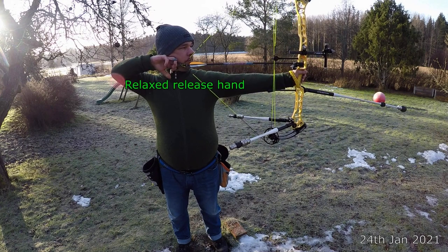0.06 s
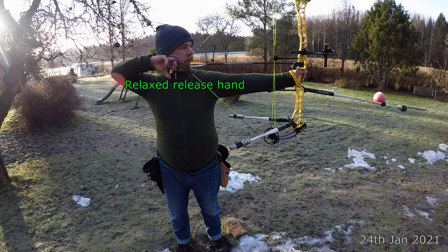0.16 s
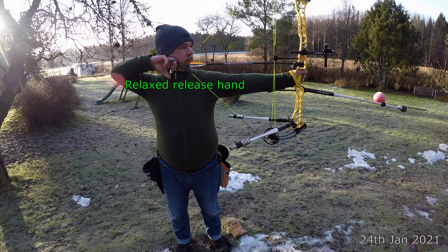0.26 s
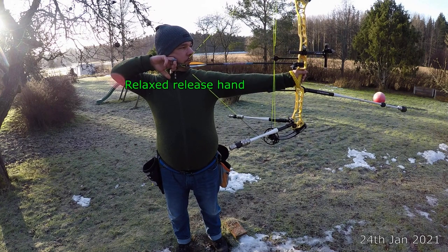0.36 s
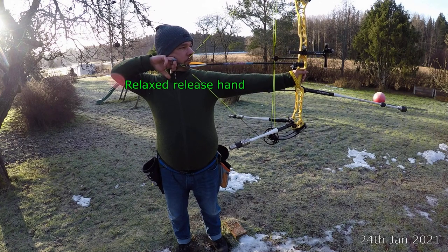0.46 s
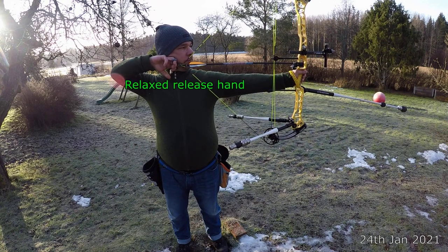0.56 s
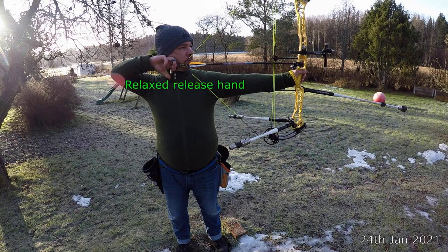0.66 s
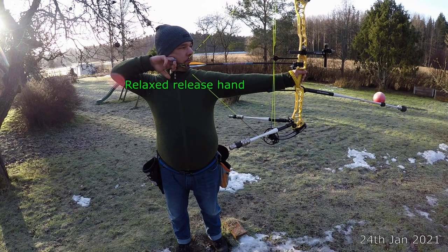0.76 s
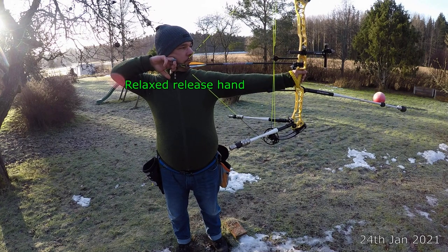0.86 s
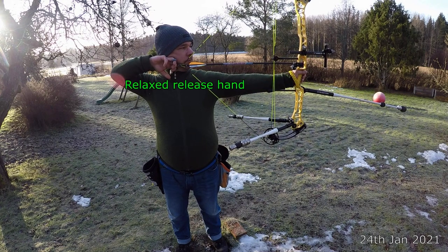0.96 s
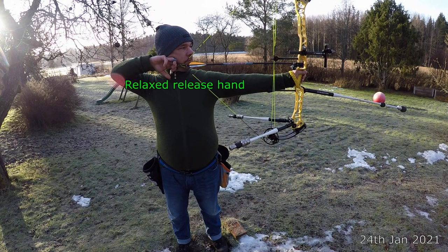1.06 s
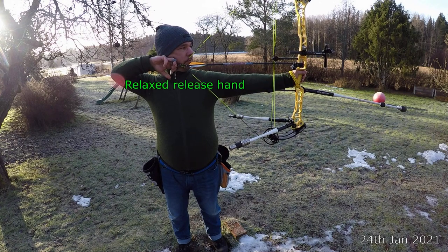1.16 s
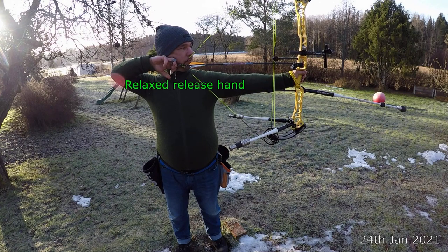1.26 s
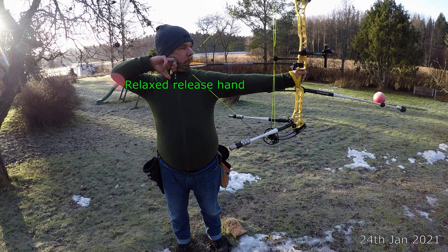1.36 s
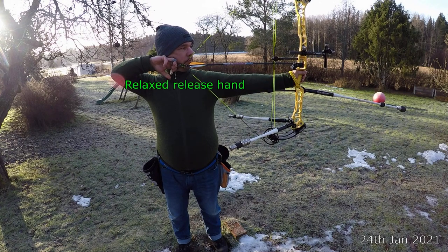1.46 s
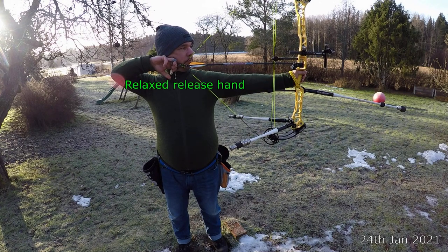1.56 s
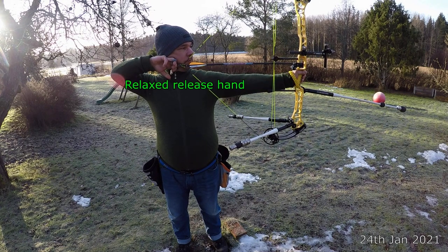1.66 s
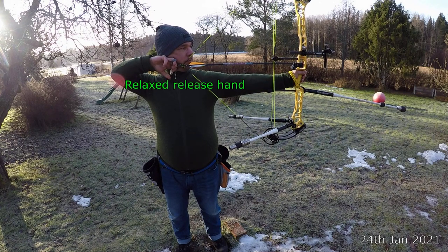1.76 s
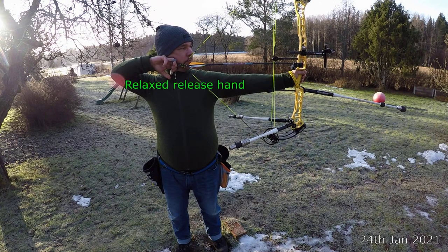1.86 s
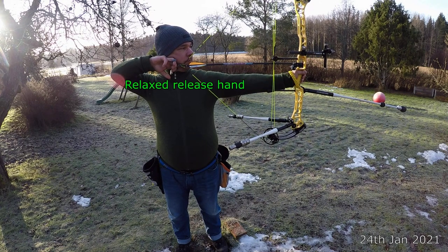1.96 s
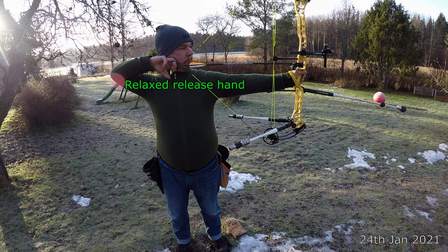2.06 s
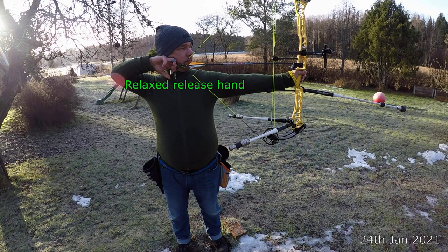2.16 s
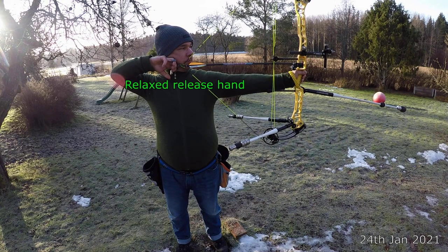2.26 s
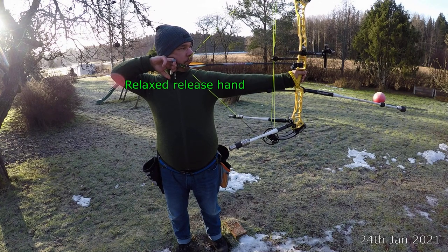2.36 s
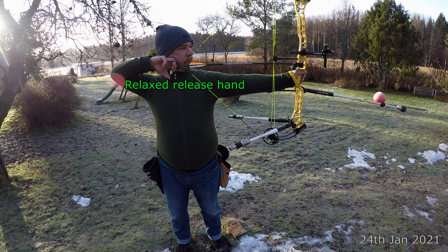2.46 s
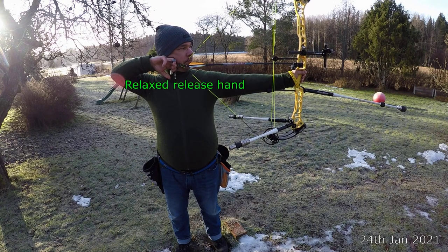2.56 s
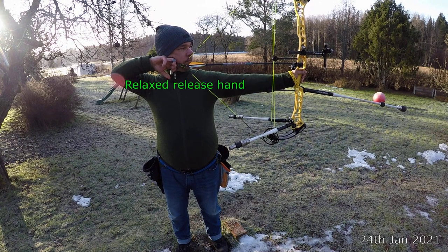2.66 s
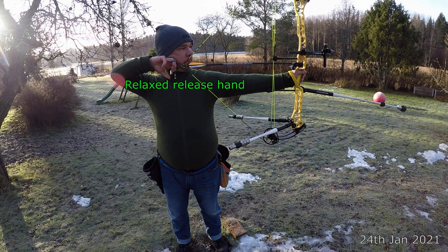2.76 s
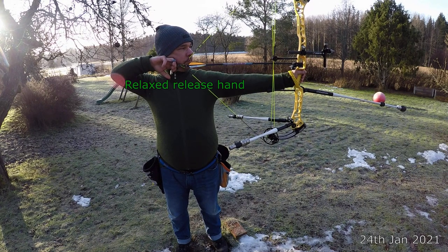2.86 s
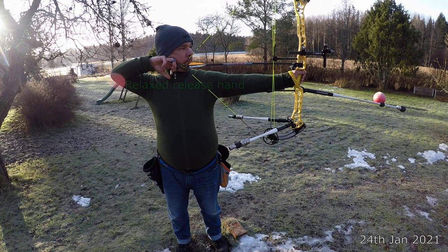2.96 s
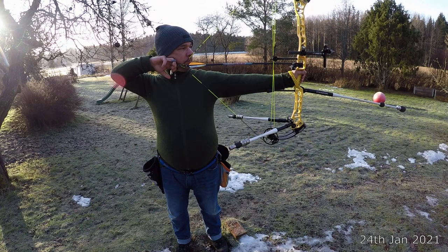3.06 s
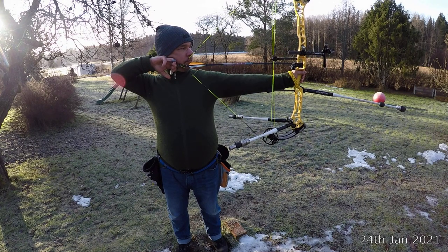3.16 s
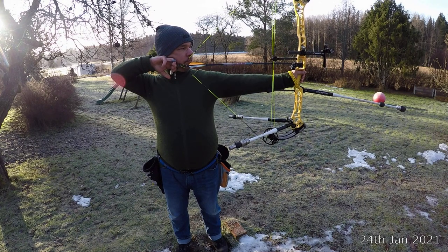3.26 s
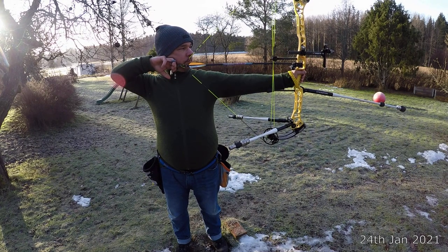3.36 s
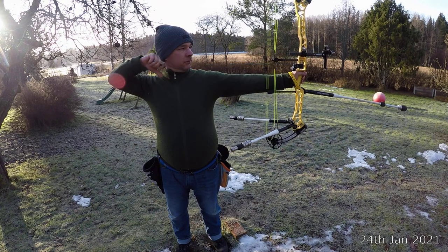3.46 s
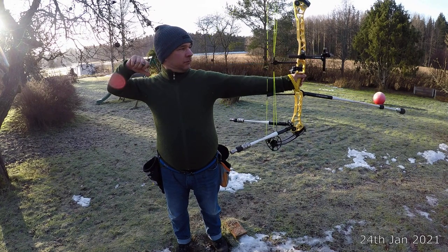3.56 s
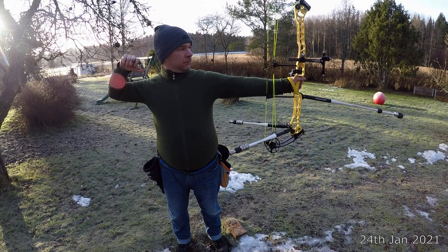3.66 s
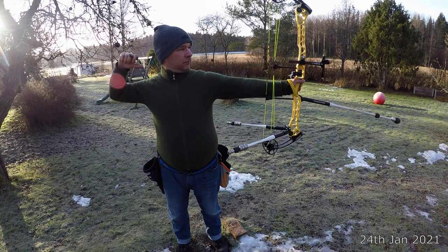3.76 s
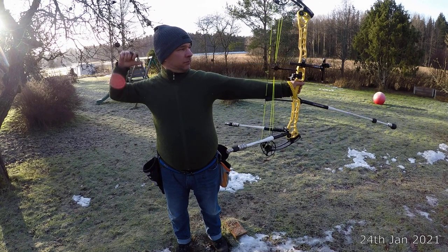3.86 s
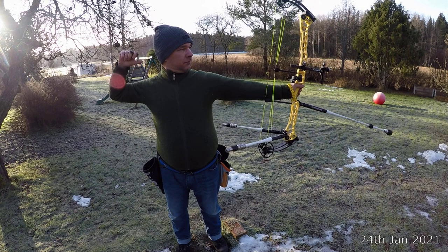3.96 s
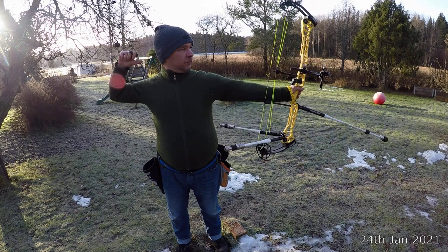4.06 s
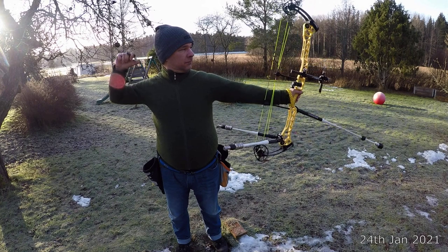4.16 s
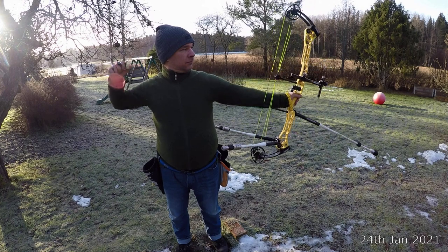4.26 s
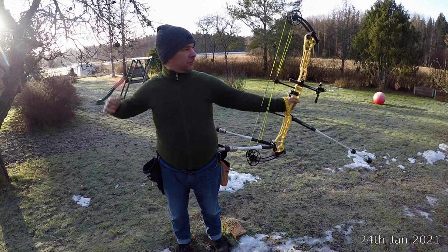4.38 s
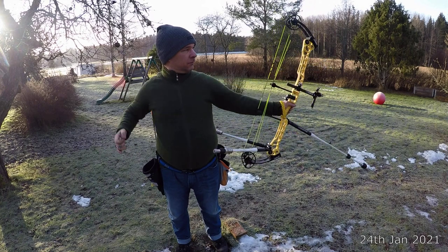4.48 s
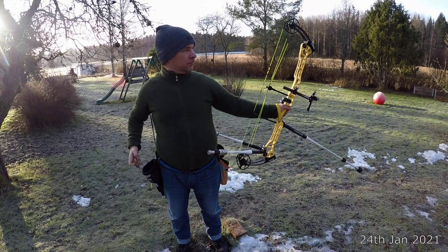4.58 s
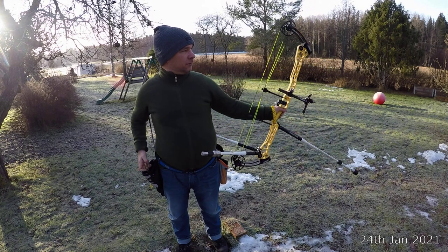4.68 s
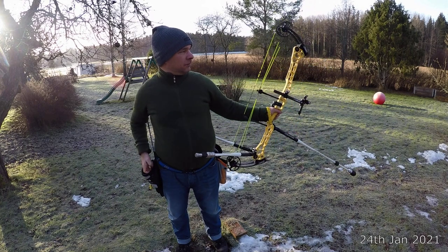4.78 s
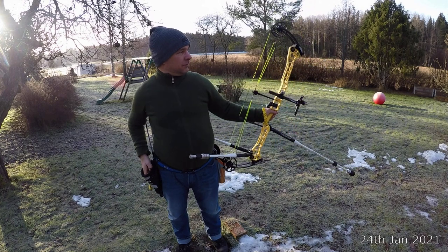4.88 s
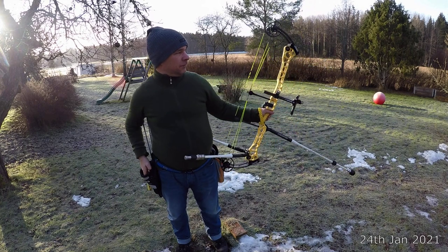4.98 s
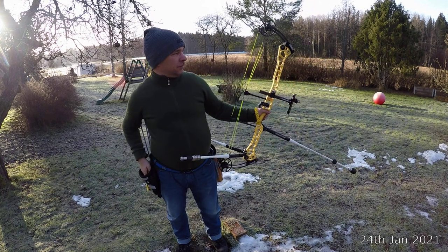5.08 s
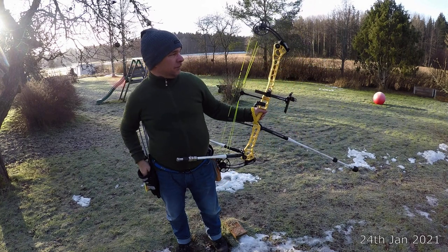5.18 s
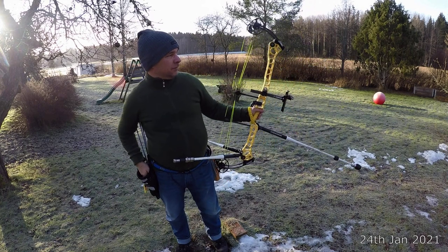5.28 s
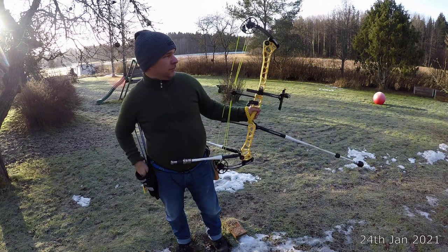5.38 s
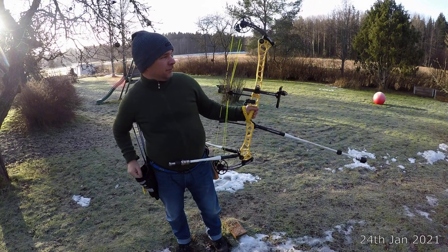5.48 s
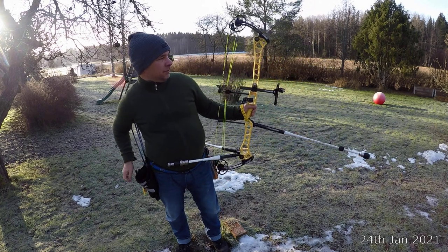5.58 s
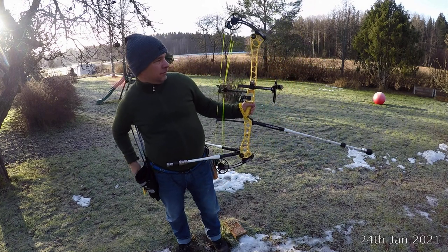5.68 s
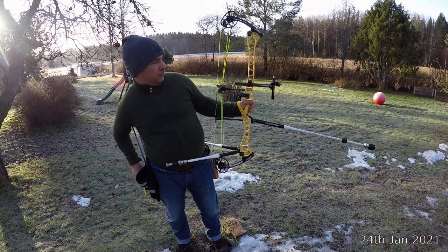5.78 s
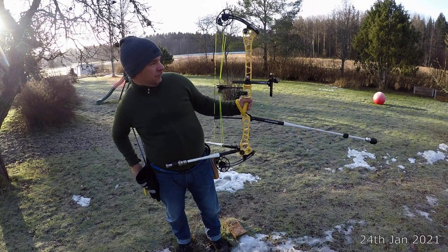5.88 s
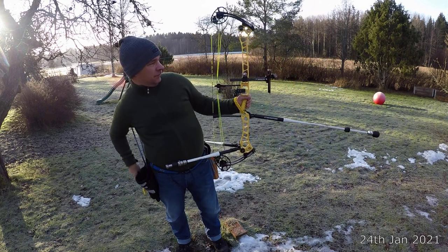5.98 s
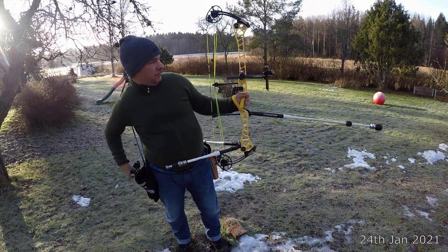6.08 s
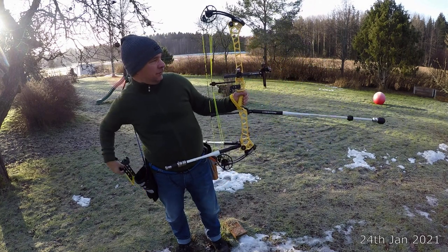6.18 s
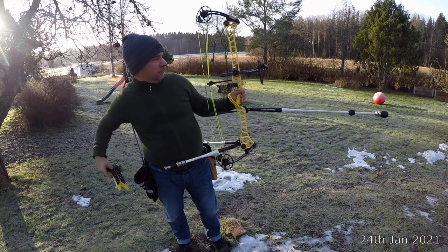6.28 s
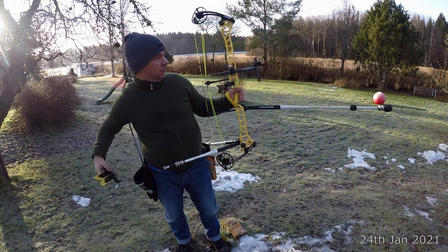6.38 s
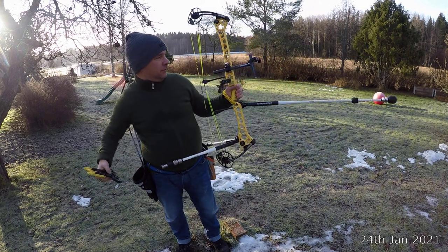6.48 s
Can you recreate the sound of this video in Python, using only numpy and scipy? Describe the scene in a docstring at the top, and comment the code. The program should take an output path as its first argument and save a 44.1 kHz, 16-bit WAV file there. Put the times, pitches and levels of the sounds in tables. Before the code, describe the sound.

Outdoors on a quiet lawn, a faint wide low rumble and thin hiss run throughout. From about 1.55 to 2.45 seconds a small bird scolds with high, buzzy arched whistles, very quick at first, then slowing. At 2.26 a crisp tiny steel double click cuts in. Around 3.02 a faint distant animal call glides up and fades. At 3.41 the release clicks; within 20 milliseconds the arrow zips briefly upward and the bow slams in a loud, dry cluster of cracks at 3.43, with a low thump, short twang, metallic ring and rattle, and a faint echo off the trees. At 3.72 the arrow smacks a target, duller and weaker, toward the right, with a short boom. The bird resumes from 3.6 to 5.7, rushing and slowing unevenly. Faint ticks come at 4.44 and 5.09, soft bumps from 5.5, cloth rustle near 6, and a light tap at 6.17.

```python
"""A compound bow is shot on a lawn: string and cams slam home in sharp cracks, and limbs and cables ring as modes.
The release aid, struck steel modes with noise bursts, clicks at full draw, clicks as it lets go, and ticks later.
The arrow zips over its rest as a sliding tone with noise, then thuds into the target: smack, modes and low thumps.
A small bird scolds in two bouts of arched whistles, a far animal calls once, and shaped noise rumbles and hisses.
At the end soft bumps, a rustle of cloth and light taps are heard as the archer reaches for his pouch."""
import sys
import numpy as np
from scipy import signal
from scipy.fft import rfft, irfft, next_fast_len
from scipy.io import wavfile
from scipy.ndimage import uniform_filter1d

SR = 44100
rng = np.random.default_rng(int(sys.argv[2]) if len(sys.argv) > 2 else 0)


def pcm_store(signal):
    """Save signal as 16-bit PCM."""
    levels = np.round(np.clip(np.atleast_2d(signal), -1, 1) * 32767)
    wavfile.write(sys.argv[1], SR, levels.astype(np.int16).T)


N = 287973
TIME = np.arange(N) / SR   # s

# Levels are in dB; some sources add a level of their own.
# Colours of the two background noises, common to both ears and opposed: (frequency [Hz], level [dB])
AIR_MID_SPECTRUM = [(30, -13.5), (100, -11), (135, -1.5), (165, -0.5), (230, -5.5), (330, -10), (480, -14),
                    (1100, -18.5), (2000, -23.5), (4700, -32), (7000, -29.5), (10000, -32.5), (15000, -48)]
AIR_SIDE_SPECTRUM = [(30, -9), (100, -8), (135, 0.5), (170, 1.5), (300, -2), (500, -4.5), (900, -5),
                     (1500, -12.5), (2500, -22), (4500, -32.5), (7000, -25.5), (10000, -29), (15000, -44.5)]
# Resonances in the microphone hiss: (frequency [Hz], bandwidth [Hz], level [dB])
HISS_RESONANCES = [(5726, 240, -72.5), (8710, 210, -80.5)]
# Pace of the bird's two bouts: both start hurried and slow down,
# the second then speeds up and slows by turns: (time [s], pace [notes/s])
FIRST_BOUT_PACE = [(1.561, 24.6), (1.97, 21.4), (2.186, 13.5), (2.46, 9.2)]
SECOND_BOUT_PACE = [(3.608, 22.3), (3.917, 21.7), (4.33, 12.9), (4.69, 9.2), (4.879, 16.0), (5.109, 6.13),
                    (5.264, 16.5), (5.484, 12.7), (5.68, 14.4)]
# Metal contacts in the release aid: (time [s], level [dB], brightness [dB/octave])
RELEASE_CONTACTS = [(2.2626, -2, 2), (2.26392, -3, -2), (3.4108, -2, -1), (3.412, -0.5, 2),
                    (4.438, -29, 12), (4.443, -30.5, 15), (5.093, -32.5, 12)]
# Modes of its steel parts: (frequency [Hz], level [dB], decay time t60 [s])
RELEASE_AID_MODES = [(513, -40, 0.034), (2330, -60, 0.017), (2810, -45, 0.021), (3120, -37.5, 0.046),
                     (3800, -19.5, 0.014), (5900, -24.5, 0.017), (6830, -26.5, 0.018), (7170, -28, 0.022),
                     (7450, -22.5, 0.012), (9440, -40, 0.024)]
# Pitch of the shaft on the rest, rising with its speed and dropping as it clears: (time [s], frequency [Hz])
SHAFT_WHINE = [(3.4275, 3000), (3.4305, 3800), (3.4338, 5400), (3.4383, 3200)]
# String and cams slam home and rebound: (time [s], level [dB])
STRING_SLAMS = [(3.4313, 0.5), (3.4367, -2), (3.4412, -11), (3.4455, -6.5), (3.4497, -12)]
# Modes of limbs, riser and cables: (frequency [Hz], level [dB], decay time t60 [s])
LIMB_AND_CABLE_MODES = [(252.6, -26, 0.2), (358, -26.5, 0.17), (392, -27.5, 0.18), (499, -25.5, 0.18),
                        (523, -30.5, 0.21), (600.5, -28, 0.25), (640, -35, 0.22), (752, -24.5, 0.19),
                        (791, -30.5, 0.28), (818, -30.5, 0.21), (1070, -33.5, 0.33), (1255, -41, .2),
                        (1470, -35, 0.26), (1697, -28, 0.15), (1870, -32, 0.18), (1950, -31, .15),
                        (2640, -35, .14), (3350, -30, 0.075), (3500, -33, 0.09), (4025, -39, .1),
                        (5960, -36, .12), (6600, -35, .11)]
# The point strikes, then the shaft drives in: (time [s], level [dB])
ARROW_IMPACTS = [(3.7198, 5), (3.7224, -14.5)]
# Modes of the target face: (frequency [Hz], level [dB], decay time t60 [s])
FACE_MODES = [(496, -33, 0.04), (665, -17, .025), (767, -16, 0.033), (990, -27, 0.02), (2470, -26, 0.043),
              (3080, -29, .035), (4400, -22, 0.025)]
# Soft bumps of body and gear: (time [s], frequency [Hz], level [dB])
SOFT_BUMPS = [(5.487, 282, -40), (5.718, 272, -39.5), (5.945, 195, -42), (6.151, 171, -41.5)]
# Taps at the pouch: (time [s], level [dB])
TAPS_AT_POUCH = [(6.1703, -38.5), (6.176, -60)]
# Colours of the contact noises and of the echo: (frequency [Hz], level [dB])
TICK_SPECTRUM = [(300, -17), (1600, -21), (3000, -2.5), (3700, -3), (4800, -19), (6000, -2.5), (7500, 2.5),
                 (8500, -16), (10000, -10), (15000, -29)]
CRACK_SPECTRUM = [(150, -29), (700, -3), (1500, -5.5), (2600, -3), (3700, -1.5), (5200, -1), (7300, -2.5),
                  (8500, -15.5), (10000, -17), (15000, -34)]   # also colours the shaft's rub and the cloth
RATTLE_SPECTRUM = [(130, -13), (300, 0.5), (800, 3), (1250, -3.5), (2500, -8.5), (4000, -14), (5200, -20),
                   (7000, -12.5), (8500, -26), (15000, -39)]
SMACK_SPECTRUM = [(200, -3), (900, 3), (1500, -3.5), (4300, -2), (5300, -11), (6500, -6.5), (9000, -11),
                  (15000, -24)]
ECHO_SPECTRUM = [(120, -14.5), (200, 1), (700, 7), (1200, 3), (2500, -3), (4000, -1), (7000, -5),
                 (9000, -11.5), (15000, -31)]
TAP_SPECTRUM = [(200, -5), (600, -5), (1050, 3.5), (2000, -5.5), (3000, -7.5), (3800, -3), (4500, -9),
                (6500, -5), (15000, -26)]

EASY_NOTES_PER_S, EASY_NOTE_S = 10.8, .056   # the pace at which notes are fullest, and their length there
NOTE_LOWER_OCT, NOTE_SHORTER_OCT = .18, .7   # octaves lower and shorter, per octave of quicker pace
HURRIED_WEAKER_DB, DRAWN_WEAKER_DB = 7, 10   # loss per octave above and below the easy pace
OPENING_OCT, OPENING_DB = .16, 3   # the first note of a bout is higher and stronger
TIRING_DB_PER_S = 1.1   # a bout fades as it goes on
NOTE_SPREAD_DB, NOTE_PITCH_SPREAD = 0.83, 0.01195   # chance from note to note (dB, share of the pitch)
CALL_START_S, CALL_ATTACK_S, CALL_LENGTH_S = 3.02, .016, .15
CALL_HZ, CALL_RISE_HZ_PER_S = 1010, 2800
CALL_DB, CALL_FADE_DB_PER_S = -55, 165
ARROW_ATTACK_S, ARROW_RELEASE_S = .0008, .0009
ARROW_SLIDE_DB, ARROW_FADE_DB_PER_S = -14, 900   # the steady slide eases off as the arrow leaves
ARROW_JOLT_DB, ARROW_JOLT_T60_S = -8.5, 0.01   # each slam jolts the shaft against the rest
LOW_CUT_HZ, BASS_LEAK_DB, CUTOFF_HZ = 152.7, -19.5, 15500


def from_db(db):
    """Level: decibels to amplitude gain."""
    return 10 ** (np.asarray(db) / 20)


def rms_one(x):
    """Normalization: scale to unit rms."""
    return x / np.sqrt(np.mean(x ** 2) + 1e-20)


def pan(left_db):
    """Interaural level difference: channel gains for a left-minus-right level."""
    return from_db([[left_db / 2], [-left_db / 2]])


def noise(spectrum):
    """Spectral shaping: white noise weighted in frequency, at unit rms."""
    hz, level_db = np.transpose(spectrum)
    size = next_fast_len(N)
    bins_hz = np.arange(size // 2 + 1) * SR / size
    gain = from_db(np.interp(np.log(bins_hz + 1), np.log(hz), level_db))
    white = rng.standard_normal(size)
    return rms_one(irfft(rfft(white) * gain, size)[:N])


def wide_noise(spectrum, side_db):
    """Decorrelation: a common noise plus one in antiphase, whose level sets how unlike the channels are."""
    middle = noise(spectrum)
    side = noise(spectrum) * [[1], [-1]]
    return rms_one(middle + from_db(side_db) * side)


def ring(drive, hz, t60):
    """Damped resonance: a unit click sets a decaying sine of initial height 1 ringing."""
    radius = from_db(-60 / (t60 * SR))
    angle = 2 * np.pi * hz / SR
    # the tiny offset keeps the filter from stalling on vanishing numbers
    return signal.lfilter([0, np.sin(angle)], [1, -2 * radius * np.cos(angle), radius ** 2], drive + 1e-18)


def clicks(hits):
    """Impulsive excitation: one impulse for each (time [s], level [dB])."""
    out = np.zeros(N)
    for s, db in hits:
        out[round(s * SR)] += from_db(db)
    return out


def fading(hits, rise, t60):
    """Exponential decay: an envelope that swells and dies after each (time [s], level [dB])."""
    out = np.zeros(N)
    for s, db in hits:
        start = round(s * SR)
        age = TIME[:min(SR, N - start)]
        out[start:start + len(age)] += from_db(db - 60 * age / t60) * (1 - np.exp(-age / rise))
    return out


def thump(s, hz, swell):
    """Heavily damped oscillation: a few low cycles whose envelope peaks at 1 after the swell time."""
    age = np.clip((TIME - s) / swell, 0, 20)   # in swell times
    envelope = (age * np.exp(1 - age)) ** 2
    return envelope * np.sin(2 * np.pi * hz * swell * age)


def gate(start, end, attack, release):
    """Linear gating: an envelope that opens at start, holds, and has closed by end (all in s)."""
    return np.clip(np.minimum((TIME - start) / attack, (end - TIME) / release), 0, 1)


def sliding_tone(hz):
    """Frequency modulation: phase is the integral of the pitch curve; unit rms."""
    return np.sqrt(2) * np.sin(2 * np.pi * np.cumsum(hz) / SR)


def clatter(spread_db, grain):
    """Random modulation: uneven loudness of many tiny contacts, each about one grain (s) long."""
    knots = np.arange(0, TIME[-1] + grain, grain)
    strengths = np.clip(rng.standard_normal(len(knots)), -2, 2)
    return rms_one(from_db(spread_db * np.interp(TIME, knots, strengths)))


def scattered(x, t60):
    """Diffuse reflection: convolution with decaying noise, different at each ear."""
    age = TIME[:SR // 2]
    envelope = from_db(-60 * age / t60) * (1 - np.exp(-age / 0.0037))
    response = rng.standard_normal((2, len(age))) * envelope
    response /= np.sqrt(np.sum(response ** 2, axis=1, keepdims=True))   # unit energy
    return signal.fftconvolve(x[None], response, axes=1)[:, :N]


def background():
    """Coloured noise: a distant rumble, very wide in the middle range, and resonant microphone hiss."""
    rumble = from_db(-51.5) * noise(AIR_MID_SPECTRUM)
    width = from_db(-48.5) * noise(AIR_SIDE_SPECTRUM) * [[1], [-1]]
    hiss = 0
    for hz, bandwidth, db in HISS_RESONANCES:
        t60 = np.log(1000) / (np.pi * bandwidth)
        hiss = hiss + from_db(db) * rms_one(ring(rng.standard_normal(N), hz, t60))
    return rumble + width + hiss * pan(left_db=-16.0)


def bout(pace, easy_hz, easy_db):
    """Rate coupling: pace spaces the notes and sets their pitch, level and length (s, Hz, dB, length s)."""
    s, per_s = np.transpose(pace)
    span = np.arange(s[0], s[-1], 1 / SR)
    sung = np.cumsum(np.interp(span, s, per_s)) / SR   # notes sung so far
    times = np.interp(np.arange(sung[-1]), sung, span)
    hurry = np.log2(np.interp(times, s, per_s) / EASY_NOTES_PER_S)   # octaves of pace
    opening = times == times[0]
    sharper, louder = rng.standard_normal((len(times), 2)).T
    hz = easy_hz * 2 ** (OPENING_OCT * opening - NOTE_LOWER_OCT * hurry) * (1 + NOTE_PITCH_SPREAD * sharper)
    strain_db = np.maximum(HURRIED_WEAKER_DB * hurry, -DRAWN_WEAKER_DB * hurry)
    tiring_db = TIRING_DB_PER_S * (times - s[0])
    db = easy_db + OPENING_DB * opening - strain_db - tiring_db + NOTE_SPREAD_DB * louder
    length = EASY_NOTE_S * 2 ** (-NOTE_SHORTER_OCT * hurry)
    return list(zip(times, hz, db, length))


def bird(buzz_ratio=0.1, arch=0.25, side_tone_db=-4, rough=0.31, waver=0.015):
    """Sidebands: a slower flutter of the syrinx puts side tones around each arched whistle."""
    out = np.zeros(N)
    notes = bout(FIRST_BOUT_PACE, easy_hz=4660, easy_db=-53.5)
    notes += bout(SECOND_BOUT_PACE, easy_hz=4460, easy_db=-49.5)
    for s, hz, db, length in notes:
        place = np.linspace(-1, 1, int(length * SR))   # from start to end of the note
        bend, crest, upper = rng.normal([1, .12, 1], [.12, .05, .2])
        jitter = rms_one(uniform_filter1d(rng.standard_normal(SR // 8), 80))[:len(place)]
        pitch = hz * (1 - arch * bend * (place - crest) ** 2 + waver * jitter)
        phase = 2 * np.pi * np.cumsum(pitch) / SR
        flutter = buzz_ratio * phase + rough * jitter
        first_pair = upper * np.sin(phase + flutter) + np.sin(phase - flutter)
        tones = np.sin(phase) + from_db(side_tone_db) * first_pair
        tones += from_db(-14) * np.sin(phase - 2 * flutter)
        tones += from_db(-9) * (np.sin(phase + 2 * flutter) + np.sin(phase + 4 * flutter))
        start = round((s - length / 2) * SR)
        out[start:start + len(place)] += from_db(db) * tones * (1 - place ** 2) ** 1.56
    # part of the song arrives by way of branches
    return (from_db(-1.5) * out + from_db(-6.5) * scattered(out, t60=0.32)) * pan(left_db=-3.5)


def release_aid():
    """Modal impact: small steel parts snap over with short bright modes, a gritty tick and a faint scatter."""
    metal = 0
    for hz, db, t60 in RELEASE_AID_MODES:
        octaves = np.log2(hz / 5000)
        strikes = clicks([(s, level + bright * octaves) for s, level, bright in RELEASE_CONTACTS])
        metal = from_db(db) * ring(strikes, hz, t60) - metal   # neighbouring modes swing in opposite senses
    contacts = [row[:2] for row in RELEASE_CONTACTS]
    grit = from_db(-22.0) * fading(contacts, rise=0.00031, t60=0.016) * wide_noise(TICK_SPECTRUM, side_db=-5)
    scatter = from_db(-39.0) * fading(contacts, rise=0.0022, t60=0.088) * wide_noise(TICK_SPECTRUM, side_db=1)
    return (metal + grit + scatter) * pan(left_db=1.0)


def far_call():
    """Upward glide with diffuse reflection: a faint animal call slides up and fades, blurred by distance."""
    age = np.clip(TIME - CALL_START_S, 0, CALL_LENGTH_S)
    opening = gate(CALL_START_S, CALL_START_S + CALL_LENGTH_S, CALL_ATTACK_S, CALL_ATTACK_S)
    level = from_db(CALL_DB - CALL_FADE_DB_PER_S * age) * opening
    call = level * sliding_tone(CALL_HZ + CALL_RISE_HZ_PER_S * age)
    return call + from_db(-6) * scattered(call, t60=0.43)


def arrow_launch():
    """Sliding friction: the shaft's whine on the rest rises with its speed and drops as it clears."""
    s, hz = np.transpose(SHAFT_WHINE)
    whine = sliding_tone(np.interp(TIME, s, hz))
    slide = from_db(ARROW_SLIDE_DB - ARROW_FADE_DB_PER_S * np.clip(TIME - s[0], 0, s[-1] - s[0]))
    jolts = from_db(ARROW_JOLT_DB) * fading(STRING_SLAMS, rise=.0003, t60=ARROW_JOLT_T60_S)
    level = (slide + jolts) * gate(s[0], s[-1], ARROW_ATTACK_S, ARROW_RELEASE_S)
    rub = from_db(-6) * wide_noise(CRACK_SPECTRUM, side_db=-11)
    cam_envelope = fading([(3.413, -1), (3.421, -1)], rise=0.0024, t60=0.13)
    cams = from_db(-26) * cam_envelope * wide_noise(TICK_SPECTRUM, side_db=2.5)
    string_envelope = fading([(3.412, 0.003)], rise=0.0018, t60=0.17)
    string = from_db(-33.5) * string_envelope * wide_noise(RATTLE_SPECTRUM, side_db=-8)
    return (level * (from_db(-3.0) * whine + rub) + cams + string) * pan(left_db=0.5)


def bow():
    """Impulse response: slams crack, limbs thump, the string twangs briefly, and the bow rings and rattles on."""
    crack_envelope = fading(STRING_SLAMS, rise=0.00013, t60=0.013)
    crack = from_db(-12.5) * crack_envelope * wide_noise(CRACK_SPECTRUM, side_db=-9)
    limbs = from_db(-13.5) * thump(3.4288, hz=188, swell=0.0057)
    twang = from_db(-18.0) * thump(3.436, hz=339, swell=0.011)
    rebound = clicks(STRING_SLAMS[1:2])
    body = 0
    for k, (hz, db, t60) in enumerate(LIMB_AND_CABLE_MODES):
        sense = (-1) ** k   # neighbouring modes swing in opposite senses, so their ring swells
        side = pan(left_db=-6.5 if 450 < hz < 1300 else -.8)   # the middle modes lean furthest right
        body = body + sense * from_db(db) * ring(rebound, hz, t60) * side
    rattle_envelope = fading(STRING_SLAMS, rise=0.0073, t60=0.18) * clatter(spread_db=3.5, grain=0.0016)
    rattle = from_db(-27.5) * rattle_envelope * wide_noise(RATTLE_SPECTRUM, side_db=-5.5)
    return crack * pan(left_db=2.0) + (limbs + twang + rattle) * pan(left_db=-2) + body


def garden_echo():
    """Diffuse reverberation: the surrounding trees scatter the shot back faintly, as decaying noise."""
    envelope = fading([(3.44, 6.5), (3.725, -5)], rise=0.015, t60=0.65)
    return from_db(-44) * envelope * wide_noise(ECHO_SPECTRUM, side_db=-1.5)


def target():
    """Inelastic impact: a smack on the face, then the butt booms as it stops the arrow."""
    smack_envelope = fading(ARROW_IMPACTS, rise=.0001, t60=0.012)
    smack = from_db(-25.5) * smack_envelope * wide_noise(SMACK_SPECTRUM, side_db=0.0)
    strikes = clicks(ARROW_IMPACTS[1:])
    face = sum(from_db(db) * ring(strikes, hz, t60) for hz, db, t60 in FACE_MODES)
    shaft_envelope = fading(ARROW_IMPACTS, rise=0.0036, t60=0.19)
    shaft = from_db(-43) * shaft_envelope * wide_noise(SMACK_SPECTRUM, side_db=0)
    boom = from_db(-20.5) * thump(3.7235, hz=164, swell=0.0059)
    boom += from_db(-28.5) * thump(3.7215, hz=260, swell=0.0069)
    afterboom = from_db(-44) * thump(3.745, hz=216, swell=0.024)
    return (smack + face) * pan(left_db=-9.0) + shaft * pan(left_db=-5.5) + (boom + afterboom) * pan(left_db=-3.5)


def handling():
    """Soft contact and friction: dull bumps, a rustle of cloth and light taps at the pouch."""
    bumps = sum(from_db(db) * thump(s, hz, swell=0.0037) for s, hz, db in SOFT_BUMPS)
    taps = fading(TAPS_AT_POUCH, rise=.0003, t60=0.04) * wide_noise(TAP_SPECTRUM, side_db=-6.5)
    strokes = fading([(5.91, 1), (6.03, -1), (6.085, 3.5)], rise=.012, t60=0.19)
    rustle = strokes * clatter(spread_db=5, grain=.003)
    cloth = from_db(-54.5) * rustle * wide_noise(CRACK_SPECTRUM, side_db=-11)
    return bumps + taps + cloth


def scene():
    """Superposition: the shot and its surroundings add linearly."""
    shot = release_aid() + arrow_launch() + bow() + garden_echo() + target()
    return background() + bird() + far_call() + shot + handling()


def record(dry):
    """Band limiting: a steep wind filter leaves only a weak leak of the bass, and the top is cut."""
    high_pass = signal.butter(8, LOW_CUT_HZ, "high", fs=SR, output="sos")
    low_cut = signal.sosfilt(high_pass, dry)
    low_pass = signal.ellip(10, .2, 80, CUTOFF_HZ, fs=SR, output="sos")
    return signal.sosfilt(low_pass, low_cut + from_db(BASS_LEAK_DB) * dry)


dry = scene()
out = record(dry)
pcm_store(out)
```